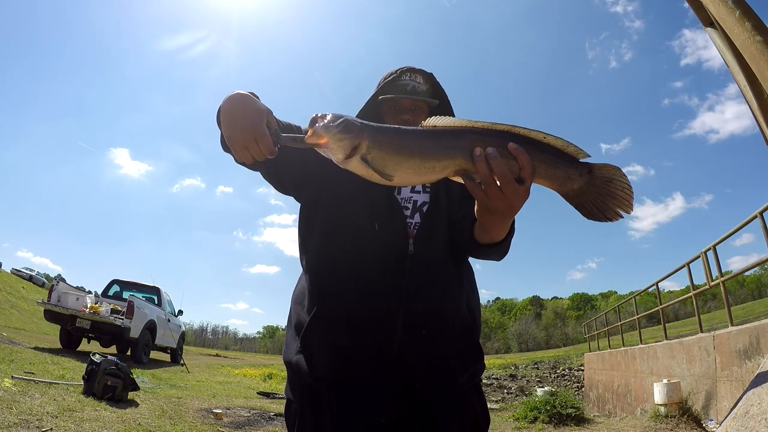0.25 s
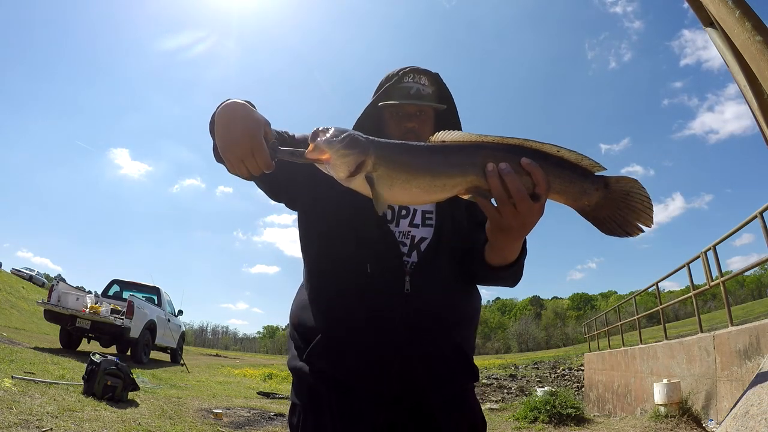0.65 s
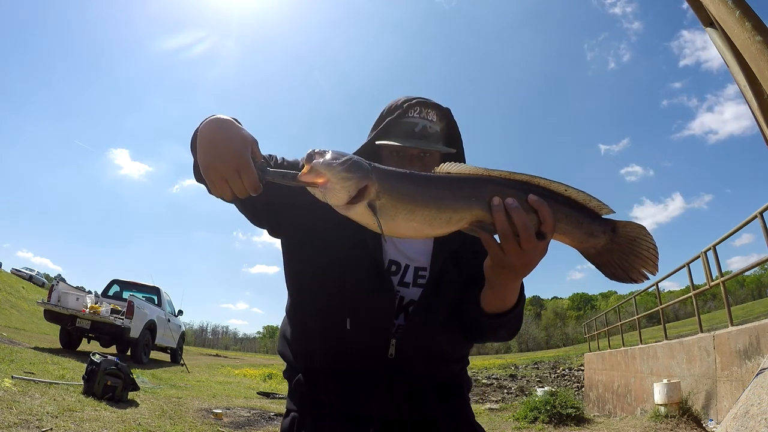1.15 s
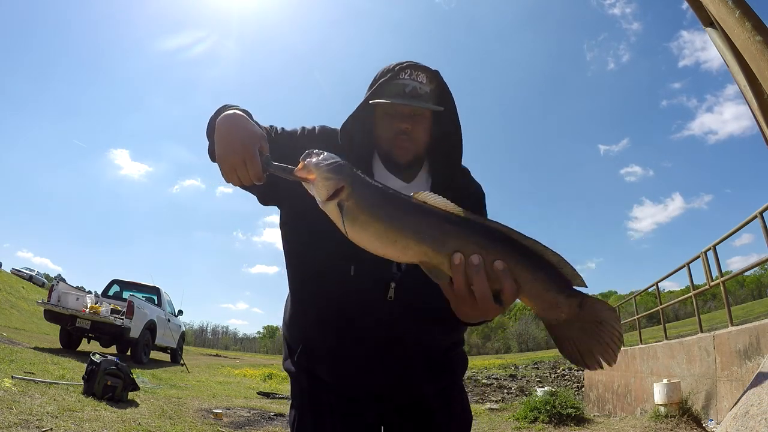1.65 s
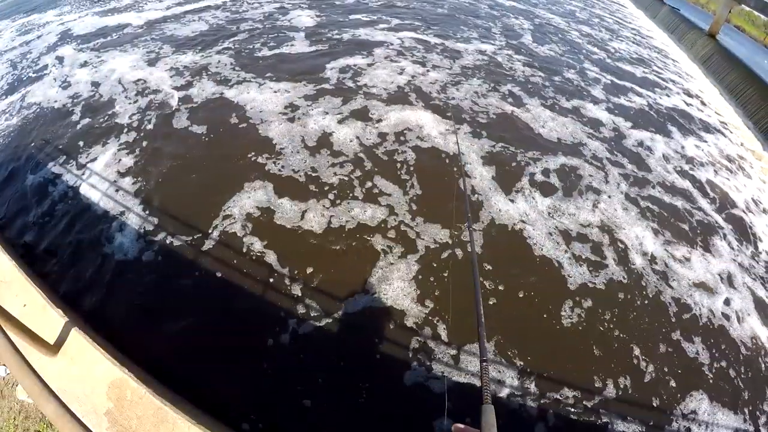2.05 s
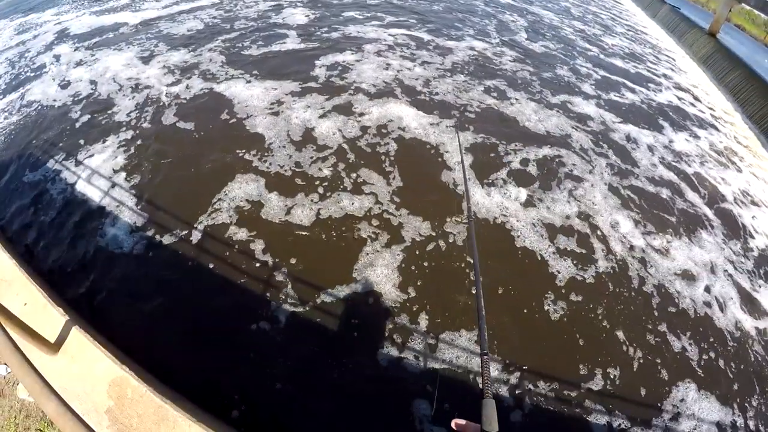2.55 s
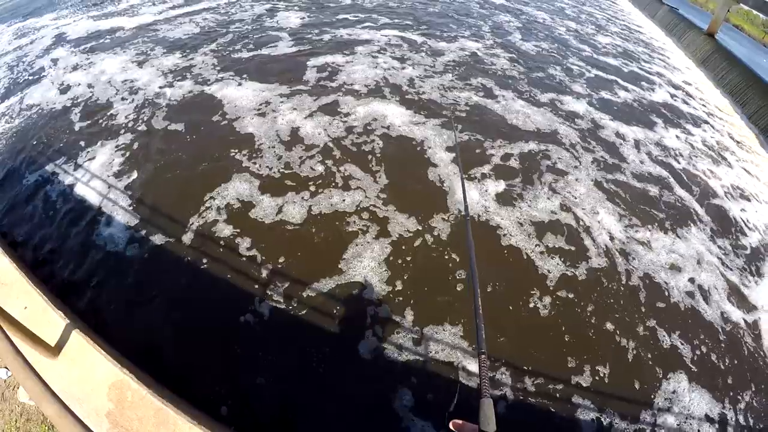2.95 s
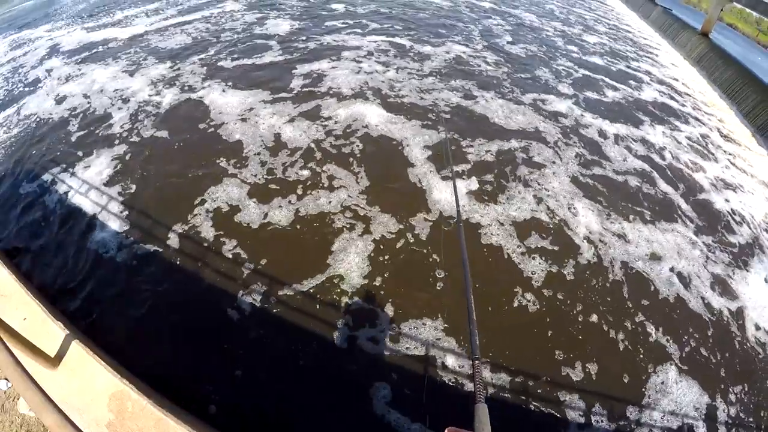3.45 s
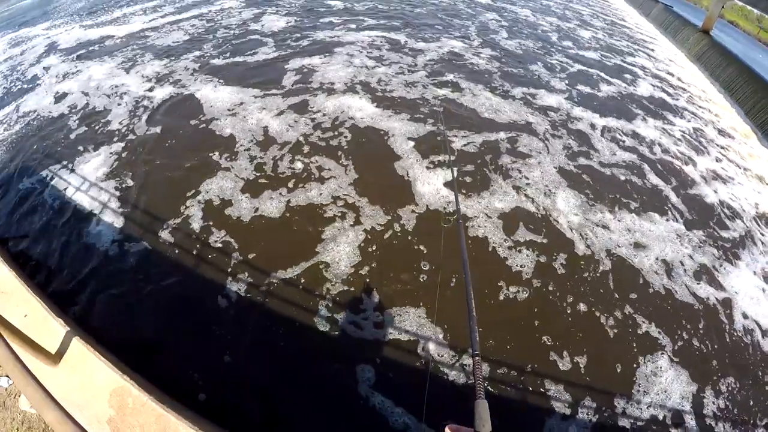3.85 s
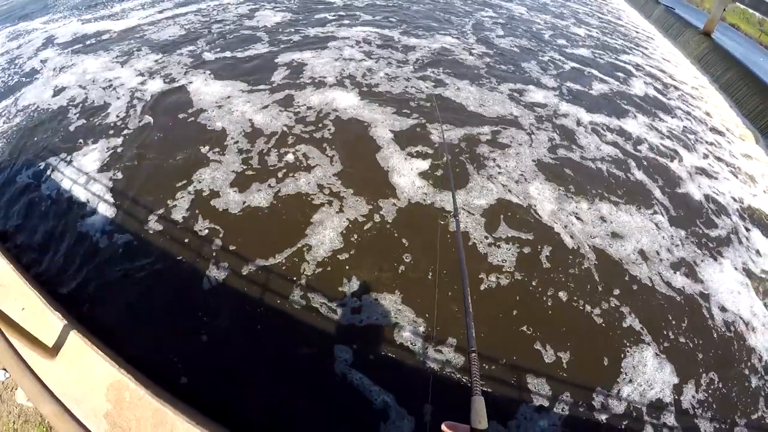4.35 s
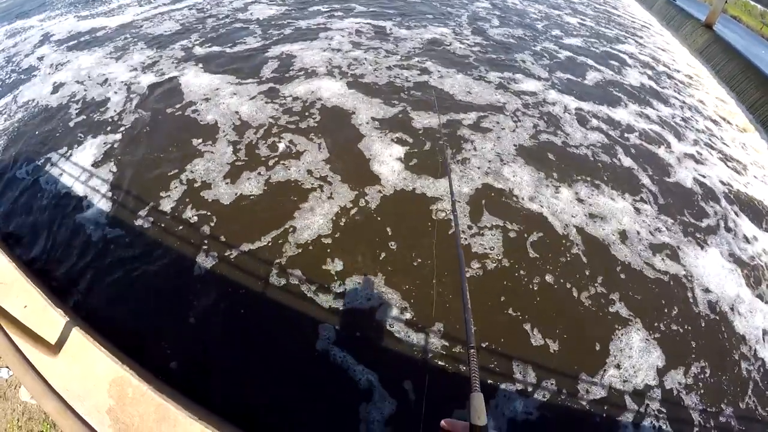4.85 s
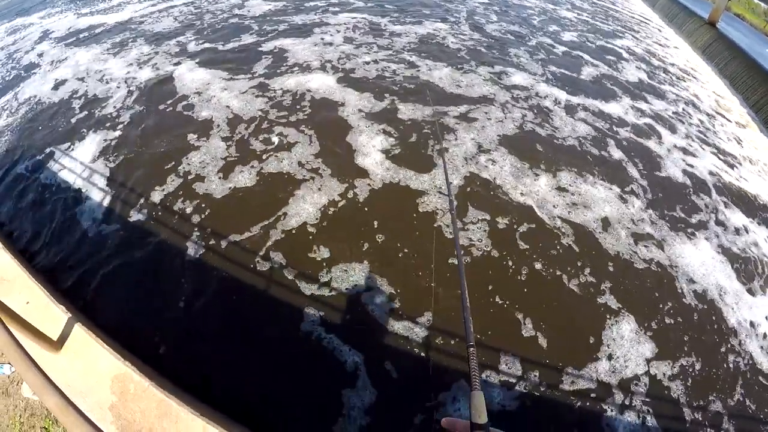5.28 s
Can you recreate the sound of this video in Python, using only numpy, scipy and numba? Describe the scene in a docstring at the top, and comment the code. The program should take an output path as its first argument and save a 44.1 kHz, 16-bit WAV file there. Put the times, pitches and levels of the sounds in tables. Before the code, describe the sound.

White water roars and churns below a dam while wind buffets the microphone in low gusts.

```python
"""White water below a dam

The outflow churns, heard first from the grassy bank, then, after a quick change of place, from the
railing right above it, where the spray is louder and brighter. Falling water roars and bubbles burst
in the foam. Wind buffets the small microphone in low gusts and a few sudden slaps."""
import sys
import numpy as np
from scipy import signal
from scipy.fft import rfft, irfft, next_fast_len
from scipy.io import wavfile
from scipy.ndimage import uniform_filter1d
from numba import njit

SR = 44100
rng = np.random.default_rng(int(sys.argv[2]) if len(sys.argv) > 2 else 0)


def pcm_store(signal):
    """Save signal as 16-bit PCM."""
    levels = np.round(np.clip(np.atleast_2d(signal), -1, 1) * 32767)
    wavfile.write(sys.argv[1], SR, levels.astype(np.int16).T)


N = 243431
T = np.arange(N) / SR
FFT_SIZE = next_fast_len(N)
HZ = np.maximum(np.arange(FFT_SIZE // 2 + 1) * SR / FFT_SIZE, 1.)


# The roar from the grassy bank. Each row: frequency in Hz, relative level per Hz in dB.
BANK_ROAR = [(40, -19), (95, -2), (150, -7), (200, -8), (238, -3.5), (290, -8), (350, -12.5), (440, -12),
             (560, -18), (1000, -22), (1900, -27.5), (3300, -29), (5000, -33), (6500, -37.5),
             (15200, -47.5)]
# The roar from the railing, right above the water. Each row: frequency in Hz, relative level per Hz in dB.
RAILING_ROAR = [(40, -16), (90, -2), (200, -2.5), (400, -10.5), (620, -15.5), (950, -15.5), (1250, -20.5),
                (1800, -23), (3300, -24), (5000, -30), (7500, -35), (11000, -40), (15200, -44)]
# Slow surging of the whole outflow. Each row: time in seconds, rise or dip in dB.
OUTFLOW_SURGE = [(0, 0.5), (.7, 0), (1.3, .3), (2, 0), (2.4, 0), (2.9, 0.1), (3.5, 0.5), (4.3, -0.4),
                 (4.9, 0.5), (5.5, 0)]


def outflow(move_s, fade_s):
    """The surging white water: the sound at the bank crossfades into the sound at the railing."""
    bank = level(white_water(BANK_ROAR, splash_db=0.0, flicker_db=0.18), db=-28.5)
    railing = level(white_water(RAILING_ROAR, splash_db=0.62, flicker_db=0.05), db=-27)
    fade = np.clip((T - move_s) / fade_s, 0, 1) * np.pi / 2
    surge = undb(np.interp(T, *np.transpose(OUTFLOW_SURGE)))
    return surge * (np.cos(fade) * bank + np.sin(fade) * railing)


def white_water(roar, splash_db, flicker_db):
    """Falling water and foam in octave bands: each flickers, and the treble shares quick splashes."""
    rush = rng.standard_normal(N)
    froth = level(foam(count=40000, scatter_db=8.0, cycles=2.8, glide=0.38), db=-7.5)
    hz, db = np.transpose(roar)
    colour = undb(np.interp(np.log(HZ), np.log(hz), db, left=-60))
    spectrum = rfft(rush + froth, FFT_SIZE) * colour
    splash = wander(29.9) + wander(90)
    out = 0
    for octave in range(-5, 5):
        octaves_away = np.clip(np.abs(np.log2(HZ / 1000) - octave), 0, 1)
        band = irfft(spectrum * np.cos(octaves_away * np.pi / 2) ** 2)[:N]
        spray = np.clip(octave / 4.6, 0, 1)  # splashes are heard in the small, high droplets
        out = out + band * undb(spray * splash_db * splash + flicker_db * wander(10.75))
    return out


def foam(count, scatter_db, cycles, glide):
    """A crowd of bursting bubbles of every size, with equal energy per Hz."""
    when, pitch, strength = rng.random((count, 3)).T
    hz = 300 * 45 ** pitch
    return rings((when * N).astype(np.int64), hz, hz * undb(scatter_db * strength), cycles, glide)


@njit
def rings(start, hz, amplitude, cycles, glide):
    """Each ring decays by 1/e in the given cycles while its pitch slides up by the share glide."""
    out = np.zeros(N + 8192)
    for k in range(len(start)):
        span = min(int(3 * cycles * SR / hz[k]), 8000)
        turn = 2 * np.pi * hz[k] / SR
        phasor = amplitude[k] + 0j
        step = np.exp(1j * turn - hz[k] / (cycles * SR))
        bend = np.exp(1j * turn * glide / span)
        for i in range(span):
            out[start[k] + i] += phasor.imag
            phasor *= step
            step *= bend
    return out[:N]


def wind():
    """The bigger the eddy that rolls over the microphone's membrane, the lower its thump."""
    big = gusting(size=0, breeze_share_db=-4.5) * eddies(hz=26.7, width_hz=23.2, evenness=0.66)
    middle = gusting(size=1, breeze_share_db=-4.5) * eddies(hz=45.7, width_hz=27.2, evenness=0.74)
    small = gusting(size=2, breeze_share_db=-7.5) * eddies(hz=72.5, width_hz=41.4, evenness=0.68)
    return big + middle + small


# The breeze on the microphone. Each row: time in seconds, level in dB before each eddy size takes its share.
BREEZE = [(0, -26), (0.6, -23.5), (1.2, -23), (1.7, -26.5), (2.4, -19), (3.0, -22.5), (3.7, -21),
          (4.2, -23), (4.9, -21.5), (5.52, -23.5)]
# Gusts on the microphone, above the breeze. Each row: start in seconds, length in seconds,
# level in dB at the gust's own eddy size, that size (0 big, 1 middle, 2 small).
MIC_GUSTS = [(0.113, .06, -21, .2), (0.55, .05, -21, 0.72), (0.64, .07, -21, .4), (1.174, 0.079, -20.5, .2),
             (1.577, 0.077, -22, 0.69), (1.767, 0.1, -16, 0.43), (1.952, 0.14, -13, 0.35),
             (2.14, 0.084, -17.5, 0.47), (2.244, 0.067, -15.5, 1.47), (2.503, 0.033, -14, 0.93),
             (2.823, 0.081, -15.5, 1.06), (2.89, .05, -16.5, .3), (3.028, 0.16, -18, 1.07),
             (3.226, 0.036, -16.5, 0.28), (3.397, .08, -18, 1.2), (3.61, 0.15, -20.5, 0.84),
             (3.78, 0.12, -18, 0.42), (3.944, 0.046, -18.5, 1.1), (4.036, .14, -15.5, 0.64),
             (4.272, .1, -15, 1.2), (4.396, 0.054, -12.5, .4), (4.456, 0.12, -13.5, 1.1),
             (4.64, .12, -15.5, 0.94), (4.879, .1, -19, .5), (5.01, 0.055, -21, .8), (5.222, .04, -21, 1.6),
             (5.395, 0.066, -17, 0.4)]


def gusting(size, breeze_share_db, rise_s=0.027, fall_s=0.041):
    """Strength of one size of eddy: its share of the breeze plus gusts near its size, added as powers."""
    power = undb(np.interp(T, *np.transpose(BREEZE)) + breeze_share_db) ** 2
    for start, length, db, gust_size in MIC_GUSTS:
        rise = (T - start) / rise_s + .5
        fall = (start + length - T) / fall_s + .5
        shape = np.clip(np.minimum(rise, fall), 0, 1)
        size_loss_db = 10.5 * (size - gust_size) ** 2
        power = power + (shape * undb(db - size_loss_db)) ** 2
    return np.sqrt(power)


def eddies(hz, width_hz, evenness):
    """Turbulent air: a band of noise whose chance swells are partly evened out."""
    rumble = bandpass(bandpass(rng.standard_normal(N), hz, width_hz), hz, width_hz)
    envelope = np.abs(signal.hilbert(rumble, FFT_SIZE)[:N])
    swell = uniform_filter1d(envelope, SR // 50)
    return level(bandpass(rumble / swell ** evenness, hz, 2 * width_hz), db=0)


# Air striking the membrane. Each row: start in seconds, starting level in dB, pitch in Hz.
AIR_SLAPS = [(1.98, -10, 149), (2.015, -18, 226), (2.127, -12.5, 124), (3.087, -17, 125), (3.227, -15, 155)]


def air_slaps():
    """Each slap of air on the microphone is a short ring that dies within a few cycles."""
    start, db, hz = np.transpose(AIR_SLAPS)
    return rings((start * SR).astype(np.int64), hz, undb(db), cycles=1.3, glide=0.)


def undb(db):
    """Decibels to gain."""
    return 10 ** (np.asarray(db) / 20)


def level(x, db):
    """Scales a sound to an rms level."""
    return x * undb(db) / np.sqrt(np.mean(x ** 2))


def wander(rate_hz):
    """Random values held 1 / rate_hz seconds and smoothed twice; spread near 1."""
    hold = int(SR / rate_hz)
    steps = np.repeat(rng.standard_normal(N // 100)[:N // hold + 1], hold)
    return 1.37 * uniform_filter1d(uniform_filter1d(steps, hold), hold)[:N]


@njit
def bandpass(x, hz, width_hz):
    """State-variable band-pass of gain 1 at the centre."""
    out = np.empty(len(x))
    band_state, low_state = 0., 0.
    tuning, damping = np.tan(np.pi * hz / SR), width_hz / hz
    for i in range(len(x)):
        band = (band_state + tuning * (x[i] - low_state)) / (1 + tuning * (tuning + damping))
        band_state = 2 * band - band_state
        low_state += 2 * tuning * band
        out[i] = damping * band
    return out


def scene():
    """One microphone, on the bank and then at the railing; the wind blows on through both."""
    return (outflow(move_s=1.7, fade_s=0.15) + wind() + air_slaps())[None]


def record(dry, top_hz=15270):
    """The recorder cuts the top steeply."""
    return signal.sosfilt(signal.ellip(14, .2, 70, top_hz, fs=SR, output="sos"), dry)


dry = scene()
out = record(dry)
pcm_store(out)
```